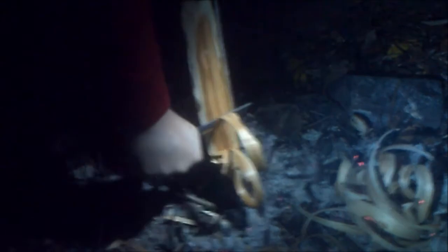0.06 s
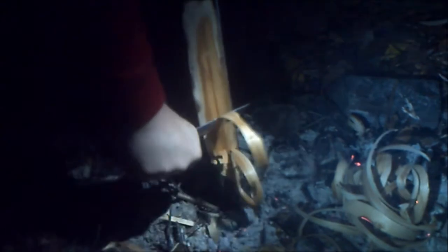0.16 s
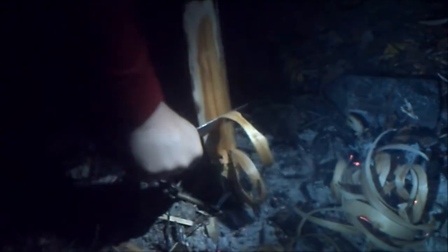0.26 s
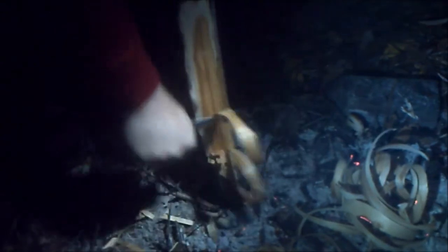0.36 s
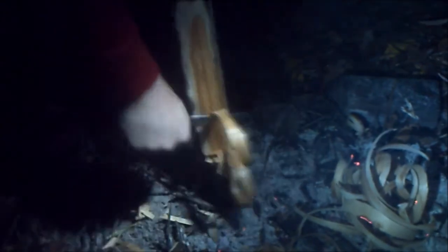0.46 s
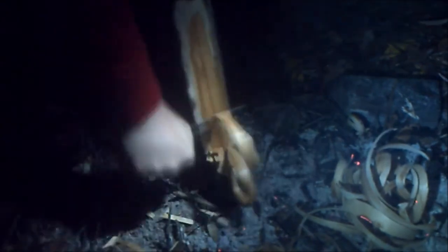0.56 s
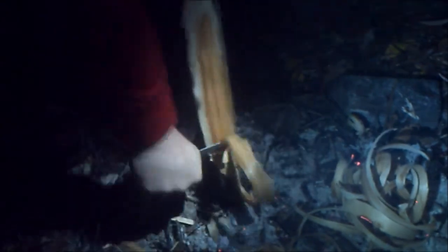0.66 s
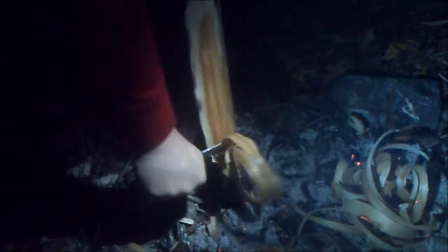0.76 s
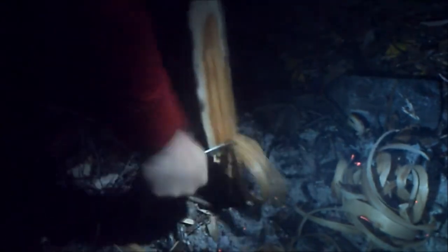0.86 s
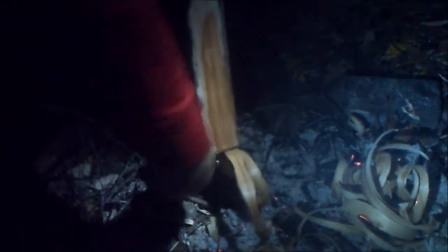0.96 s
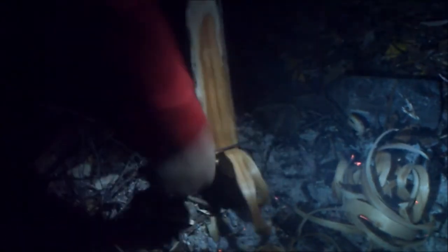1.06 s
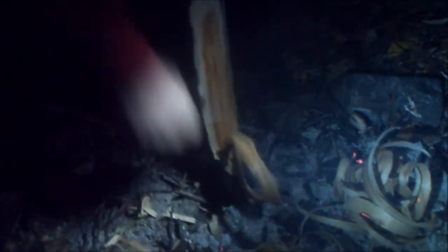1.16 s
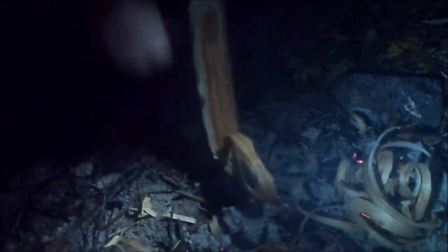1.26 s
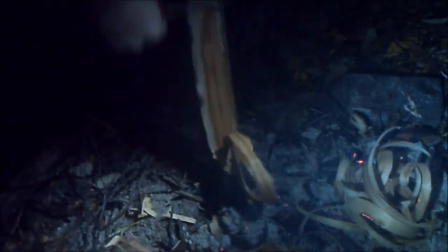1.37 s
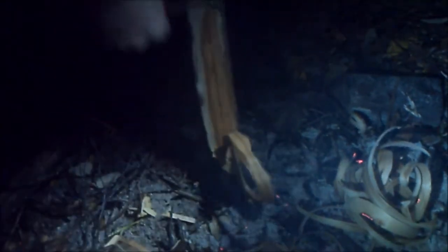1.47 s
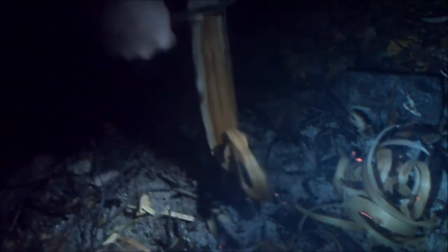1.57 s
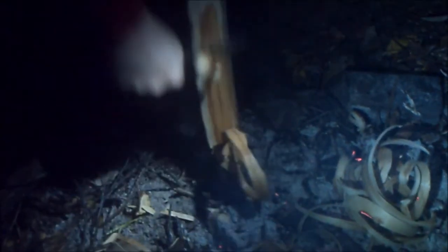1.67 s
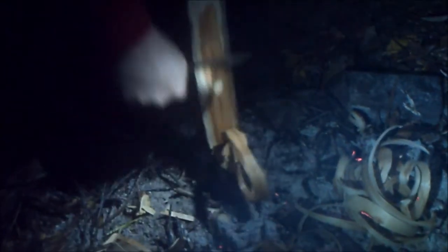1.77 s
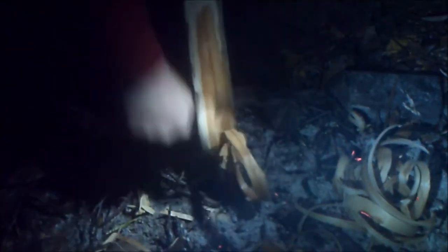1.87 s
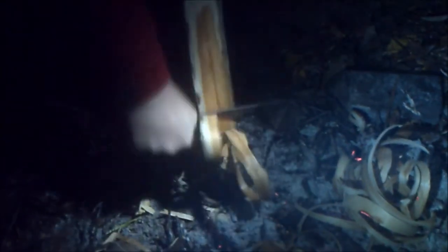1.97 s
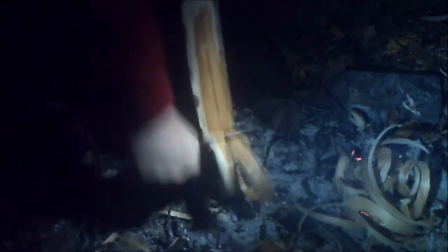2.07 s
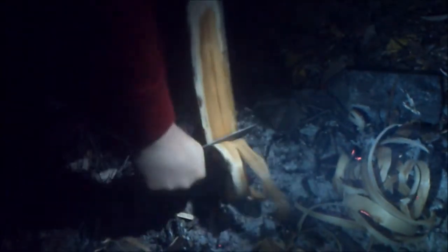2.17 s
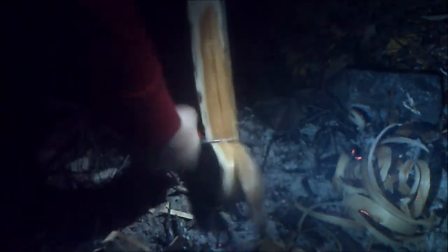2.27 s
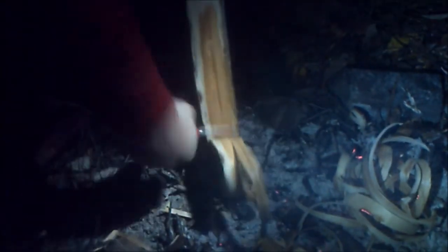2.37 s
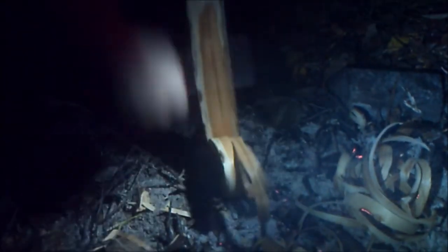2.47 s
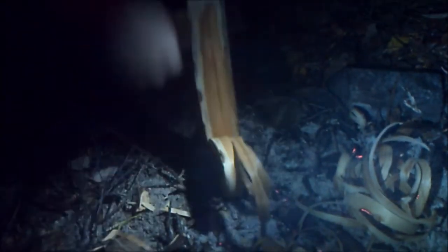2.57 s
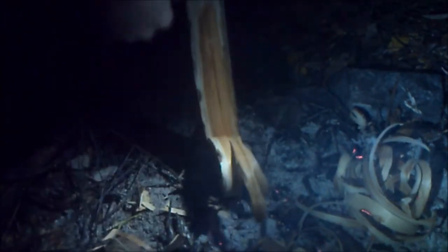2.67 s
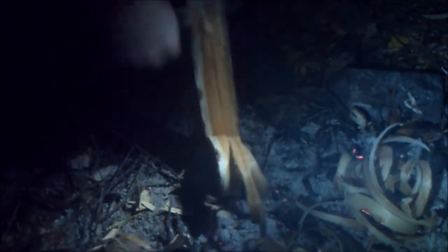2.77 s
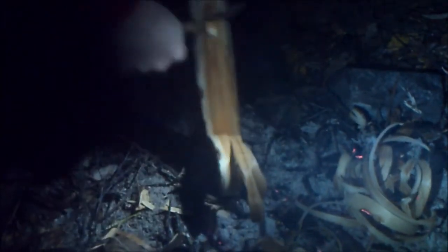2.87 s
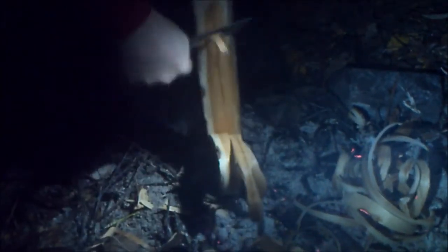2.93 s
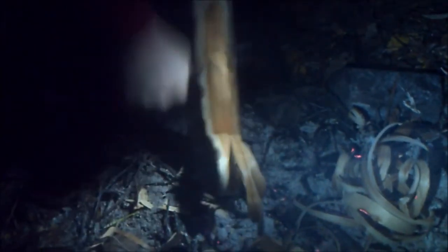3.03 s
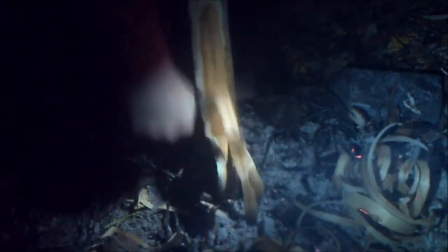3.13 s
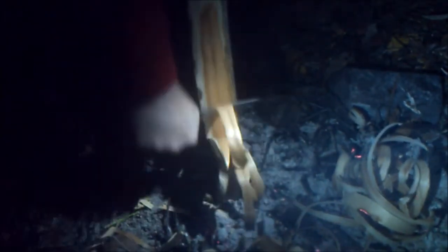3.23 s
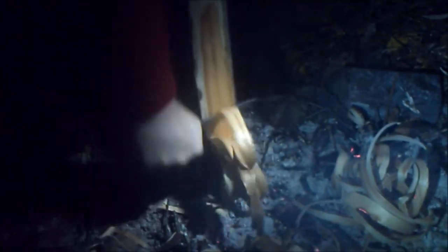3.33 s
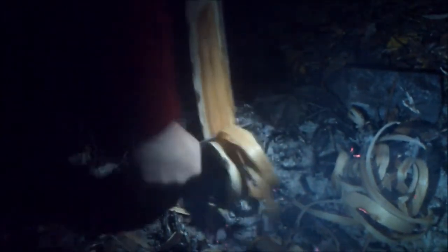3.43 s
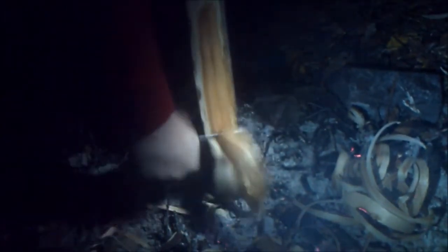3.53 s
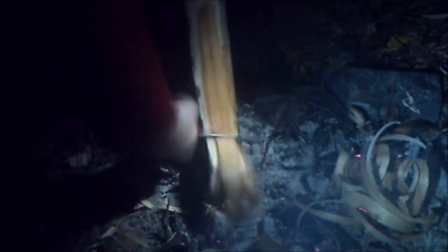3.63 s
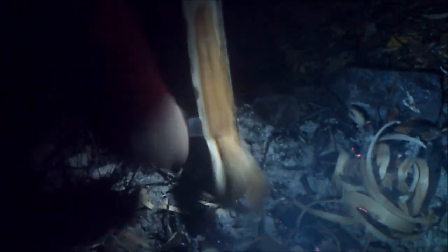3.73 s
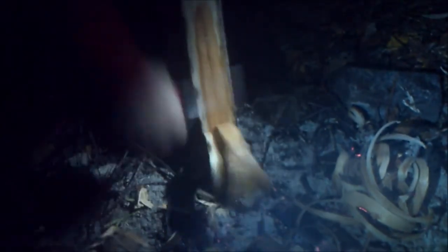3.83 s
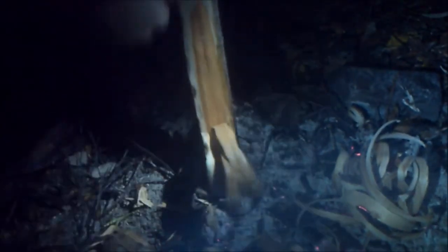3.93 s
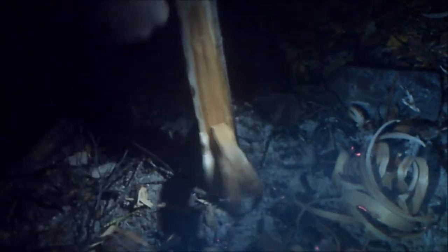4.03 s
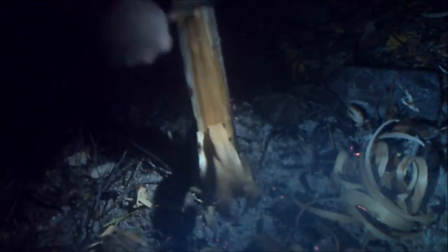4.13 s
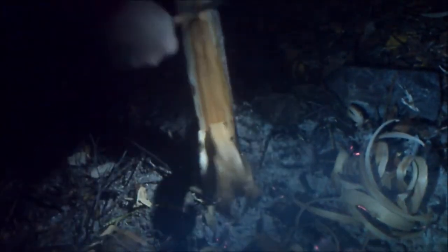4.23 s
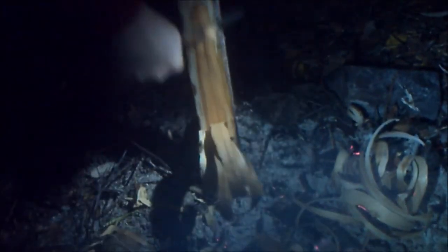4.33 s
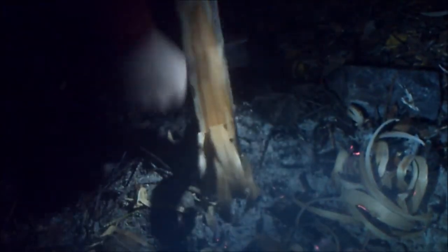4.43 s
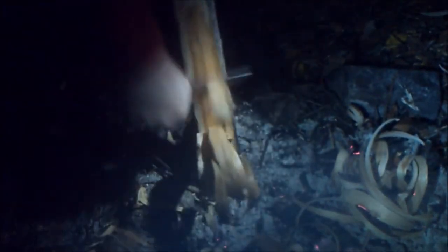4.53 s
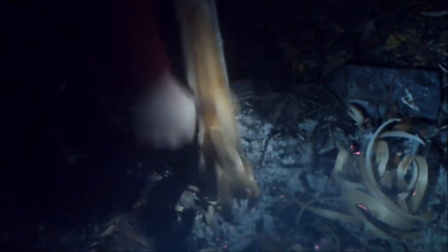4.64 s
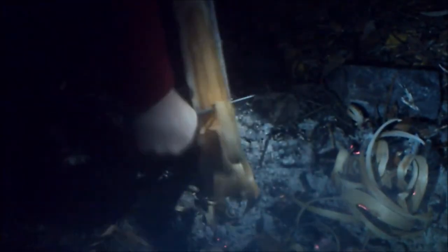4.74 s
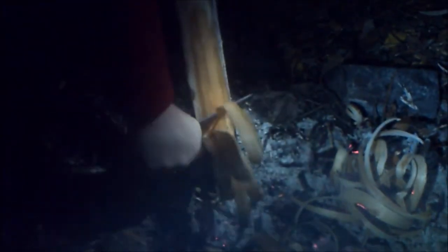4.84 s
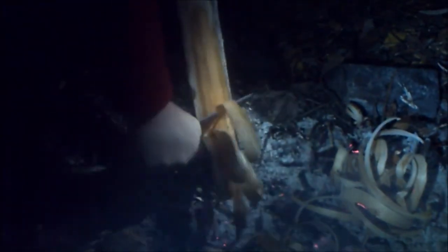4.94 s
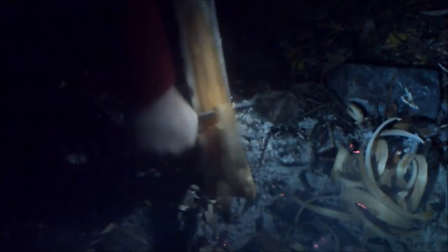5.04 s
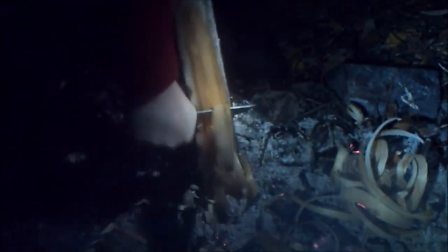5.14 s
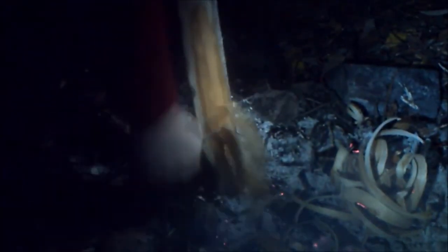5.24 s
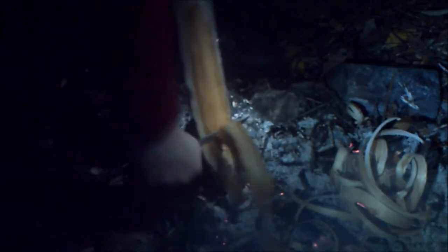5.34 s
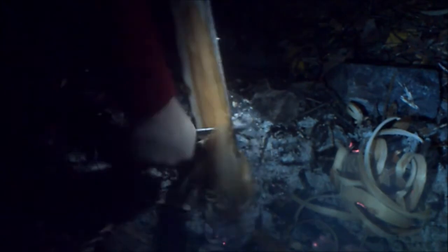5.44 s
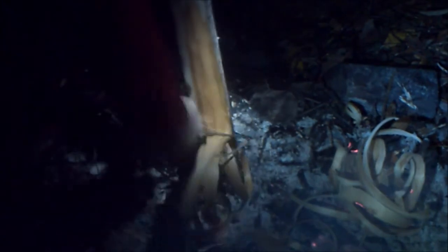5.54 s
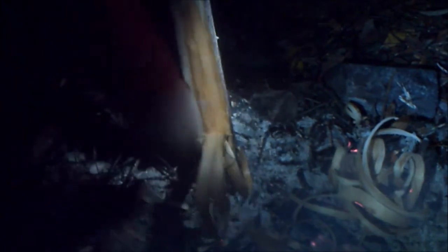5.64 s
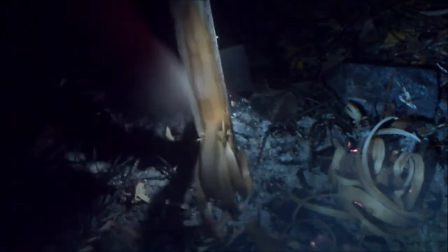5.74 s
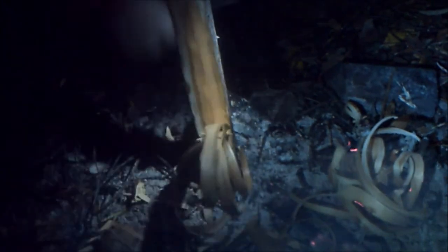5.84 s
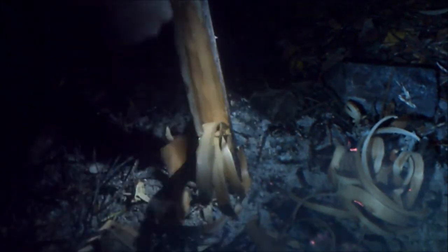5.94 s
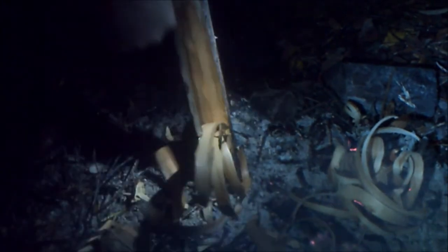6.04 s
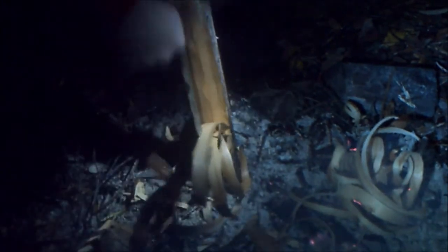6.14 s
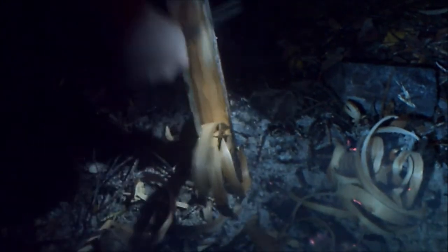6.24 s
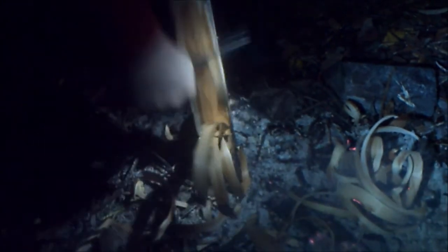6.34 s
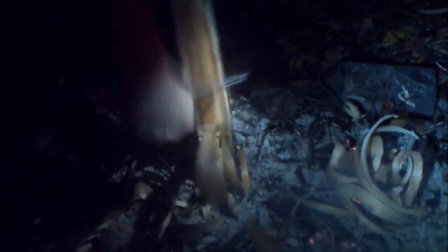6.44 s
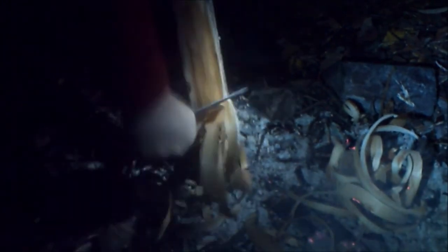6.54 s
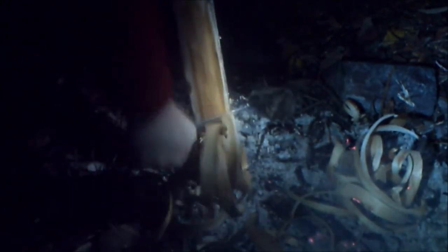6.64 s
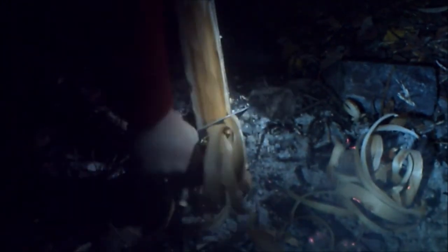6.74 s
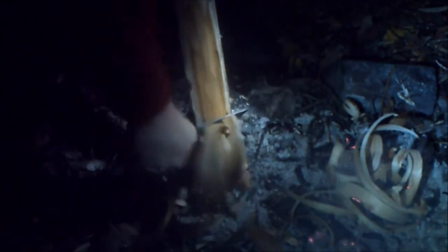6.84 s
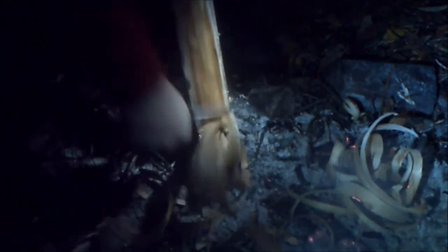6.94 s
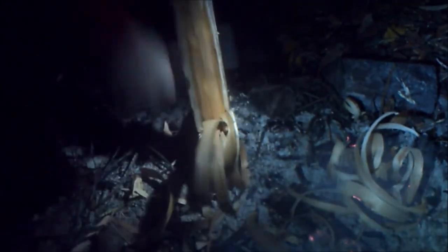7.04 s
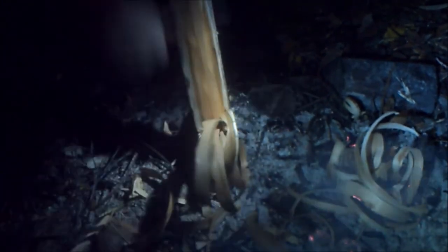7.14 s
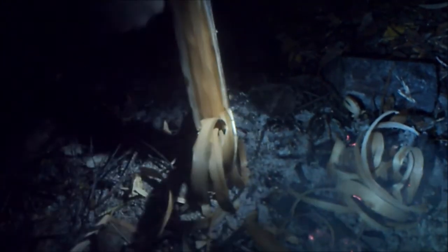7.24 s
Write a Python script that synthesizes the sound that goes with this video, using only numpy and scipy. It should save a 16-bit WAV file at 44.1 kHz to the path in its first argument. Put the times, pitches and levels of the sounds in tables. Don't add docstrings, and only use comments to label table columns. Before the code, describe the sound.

Very close to a small camera outdoors at night, a knife shaves curls from a stick. Bright, ragged scrapes and brittle snaps come in uneven bursts, with low thumps as the stick is jolted. Between strokes there are faint rustles, dry ticks and an occasional hollow rap. Steady noise with a soft low rumble and thin high whine lies underneath; the loudest cracks clip.

```python
import sys
import numpy as np
from scipy import signal
from scipy.fft import rfft, irfft, next_fast_len
from scipy.io import wavfile
from scipy.ndimage import uniform_filter1d, minimum_filter1d

SR = 44100
rng = np.random.default_rng(int(sys.argv[2]) if len(sys.argv) > 2 else 0)


def natural_amplitude(level_db):
    exponent = np.asarray(level_db, float) / 20
    return 10 ** exponent


def inscribe(sig):
    pcm = np.round(np.clip(np.atleast_2d(sig).T, -1, 1) * 32767)
    wavfile.write(sys.argv[1], SR, pcm.astype(np.int16))


N = 321919

# freq_hz, density_db
NOISE_SPECTRUM = [(12, -34), (20, 7), (140, 2.5), (199, 1), (317, 1), (1180, -7.5), (1780, -11),
                  (2400, -11), (2910, -12), (4770, -14), (8020, -14.5), (8700, -14.5), (9450, -14),
                  (11100, -18.5), (13900, -16)]
NOISE_DB = -45.5
# freq_hz, level_db
WHINES = [(8619, -63), (8689, -69), (8753, -87), (10815, -66)]

# freq_hz, density_db
EDGE_SPECTRUM = [(590, -49), (1000, -105), (1210, -126), (1500, -11.5), (2160, -11.5), (2520, -16.5),
                 (2970, -5.5), (3390, -11), (4370, -9), (6560, -3), (8170, -7), (10800, -2), (13900, -17.5)]
# freq_hz, width_hz, level_db
BLADE_MODES = [(2180, 150, -1), (1630, 120, -28), (6480, 1300, 9), (9130, 610, 15), (10700, 270, 9)]
# freq_hz, width_hz, level_db
BENDING_MODES = [(188, 82, -8.5), (240, 53, -4)]
# freq_hz, width_hz, level_db
WOOD_MODES = [(362, 73, 22), (620, 98, 7), (770, 190, 4), (1470, 350, -4), (2700, 340, -21)]

# start_s, end_s, hiss_db, chatter_db
PUSHES = [(1.6, 1.76, -35, -42), (1.775, 1.91, -26.5, -36.5), (2.0, 2.045, -28, -32.5),
          (2.875, 2.888, -33, -41.5), (2.975, 3.025, -31.5, -37.5), (3.045, 3.085, -32, -43),
          (3.1, 3.165, -28, -38.5), (3.31, 3.355, -39, -44), (3.685, 3.705, -36, -49),
          (4.375, 4.39, -26.5, -39.5), (4.458, 4.495, -30, -35.5), (4.582, 4.635, -34, -38),
          (4.745, 4.76, -40.5, -43), (5.465, 5.488, -34.5, -41), (6.14, 6.24, -48, -42),
          (6.265, 6.325, -33.5, -36), (6.408, 6.425, -36.5, -38.5)]
BITE_DB_PER_S, RELEASE_DB_PER_S = 476, 730
# start_s, end_s, hiss_db, chatter_db
RUSTLES = [(.21, .22, -56, -46), (.53, .66, -50, -49.5), (.895, .905, -44, -47.5), (1.058, 1.066, -45, -62),
           (1.2, 1.22, -48.5, -53), (1.54, 1.58, -45.5, -46), (1.93, 1.97, -41, -55),
           (2.22, 2.28, -50, -53), (2.745, 2.76, -46.5, -44.5), (3.18, 3.2, -42, -47),
           (3.27, 3.3, -40.5, -52), (3.57, 3.66, -44, -49), (4.07, 4.1, -50, -49), (4.22, 4.24, -43, -56),
           (4.26, 4.33, -46, -45), (4.69, 4.72, -50, -53), (5.02, 5.03, -47, -44.5),
           (5.25, 5.3, -43.5, -46), (5.37, 5.43, -49, -51.5), (5.6, 5.64, -45.5, -53.5),
           (6.02, 6.13, -48.5, -49.5), (2.78, 2.85, -48.5, -49.5), (6.05, 6.06, -42, -46),
           (6.47, 6.54, -47, -52)]
SWELL_DB_PER_S, SETTLE_DB_PER_S = 173, 200
# hiss_db, then chatter_db
HOVER_DB = [-60.5, -58]

# centre_s, level_db, colour_hz, width_s
SNAPS = [(.5569, -4, 7460, 0.0037), (.5515, -27, 9000, .002), (1.9745, -18, 5000, .002),
         (1.9783, -8, 11200, 0.0039), (1.9874, -13.5, 11000, 0.0052), (2.0163, -13, 6030, 0.0023),
         (2.0314, -9, 9100, 0.0064), (2.0421, -13.5, 10700, 0.0068), (2.878, -19, 7700, 0.0034),
         (3.3402, -21, 3500, 0.003), (3.5945, -26, 7000, 0.0022), (3.5862, -11.5, 9700, 0.0018),
         (4.411, -14.5, 8060, 0.005), (4.4136, -13.5, 7100, 0.0013), (4.5853, -21.5, 9300, 0.0082),
         (4.621, -19.5, 6850, 0.0095), (4.6389, -11, 6100, 0.0029), (5.2208, -15, 6950, 0.00048),
         (5.2265, -10, 10500, 0.00066), (4.653, -33, 8100, .003), (6.2253, -32, 9000, .004),
         (6.2546, -19, 8900, 0.0051), (6.3112, -29, 7600, 0.0048), (6.398, -27, 6800, 0.0028),
         (6.4, -18.5, 4370, 0.0046), (6.472, -44, 5500, 0.003), (6.591, -25, 2460, 0.0053),
         (6.584, -21.5, 2140, 0.0034), (6.6157, -18.5, 10700, 0.0046), (6.6242, -13, 8800, 0.0028)]
# centre_s, level_db, colour_hz, width_s
SLIPS = [(1.7222, -29, 9500, 0.0022), (1.7293, -30, 9700, 0.0049), (1.7446, -29, 9700, 0.0041),
         (1.7514, -30, 9000, 0.004), (1.7627, -28, 10100, 0.0025), (1.769, -23, 8800, 0.0045),
         (1.778, -30, 9900, 0.0038), (1.7887, -18.5, 7900, 0.0056), (1.7977, -17, 8200, 0.0056),
         (1.8293, -21, 9300, 0.0036), (1.8375, -23, 10000, 0.005), (1.8485, -22, 10100, 0.0054),
         (1.8749, -24, 7500, 0.0049), (1.8854, -28, 8200, 0.0034), (1.8947, -16, 7700, 0.0024),
         (1.9077, -22.5, 6800, 0.007), (1.9121, -23, 10100, 0.0029), (1.9286, -22, 5300, 0.0023),
         (1.9347, -30, 5500, 0.0024), (2.8583, -29.5, 9900, 0.0042), (2.8693, -38, 9500, 0.0026),
         (3.0947, -18, 10400, 0.002), (3.1009, -18, 9700, 0.006), (3.109, -18.5, 10800, 0.0035),
         (3.1155, -16, 10600, 0.0022), (3.135, -20, 8400, 0.0038), (3.1521, -22, 8400, 0.0021),
         (3.1585, -25, 6600, 0.0034), (3.1745, -22.5, 8800, 0.0034), (3.1824, -28, 9500, 0.0036),
         (4.3853, -25, 9700, 0.0036), (4.3913, -23, 10400, 0.002), (4.4401, -16, 6460, 0.0043),
         (4.448, -15, 8650, 0.0049), (4.4595, -22, 6600, 0.0031), (4.4646, -24, 7100, 0.0016),
         (4.469, -14.5, 7060, 0.004), (4.4751, -18, 6800, 0.0025), (4.4848, -21, 6800, 0.0049),
         (4.4941, -16, 8400, 0.0032), (4.5071, -18, 9000, 0.0024), (4.7473, -31, 7900, 0.0022),
         (4.7551, -30.5, 6200, 0.006)]
# centre_s, level_db, colour_hz
CRACKS = [(0.5657, -16, 9750), (0.581, -29, 11000), (3.432, -38, 9000), (3.544, -35, 9500),
          (3.605, -31, 10500), (0.6034, -16, 6170), (0.8712, -25.5, 8500), (1.949, -28, 5800),
          (1.969, -24, 4790), (2.005, -32, 4840), (2.155, -34, 7820), (2.894, -25, 6260),
          (3.0076, -13, 10400), (3.05, -30, 6480), (3.1453, -13.5, 8150), (3.2957, -26, 10100),
          (3.321, -35, 6510), (3.372, -30, 9230), (3.5663, -25.5, 10700), (3.6223, -30, 6000),
          (3.727, -25, 8600), (4.3377, -27, 7210), (4.3753, -28, 6600), (4.824, -24, 7400),
          (4.9496, -38, 6770), (5.019, -27, 10300), (5.366, -34, 6380), (5.3869, -22, 9100),
          (5.61, -32.5, 9210), (6.074, -28.5, 7100), (6.147, -19, 10800), (6.3588, -31, 8020),
          (6.422, -18, 11100), (6.5318, -26.5, 6850)]
# centre_s, level_db,
# colour_hz
TICKS = [(0.412, -35, 2900), (0.613, -24, 3160), (0.723, -40, 2870), (0.7377, -31.5, 2150),
         (0.7383, -34, 3040), (0.764, -39, 2180), (0.7914, -33.5, 2030), (.792, -37, 2970),
         (2.2447, -33, 1950), (2.2561, -21.5, 2060), (2.27, -37, 3000), (3.4033, -30, 3370),
         (4.7322, -35, 2950), (5.093, -34.5, 2740), (5.1921, -34, 5500), (5.263, -28, 3500),
         (6.0918, -33, 3250), (6.106, -25.5, 3270), (6.2634, -23.5, 2950), (5.2342, -7.5, 3080),
         (6.452, -26.5, 3220), (6.795, -30.5, 2200), (7.0838, -38, 3140)]
# centre_s, level_db, colour_hz
CATCHES = [(4.2433, -29.5, 10900), (4.268, -27, 10800), (4.2973, -24.5, 10300), (4.6045, -17, 6960),
           (6.1071, -28, 9000), (6.1621, -22, 6790), (6.1838, -22.5, 10600), (6.2023, -24.5, 9790),
           (6.2747, -20.5, 5900), (6.2919, -18.5, 10800), (7.085, -44, 6000)]
CRACK_S, TICK_S, CATCH_S = 0.00206, 0.0026, 0.0052
# start_s, end_s, level_db, colour_hz
JUDDERS = [
    (1.62, 1.712, -35.5, 10900),
]
SLIP_GAP_S, SLIP_JITTER, SLIP_SPREAD_DB, SLIP_S, SLIP_TINT = 0.011, 0.35, -5, 0.0058, 0.06
# freq_hz, level_db
SNAP_TILT = [(1500, -1.5), (3000, -2), (5500, -0.5), (11500, 0), (13500, -3)]

# centre_s, level_db, pitch_hz, width_s
TAPS = [(0.5578, -42.5, 711, 0.012), (0.6079, -35, 850, 0.013), (1.9796, -43.5, 682, 0.012),
        (2.0385, -55, 600, 0.019), (2.8969, -43.5, 727, 0.014), (3.1202, -42, 668, 0.0077),
        (3.3565, -24, 767, 0.0032), (3.586, -46, 751, 0.0055), (4.4142, -41, 743, 0.006),
        (4.4688, -48, 726, 0.0062), (5.23, -15.5, 1650.0, 0.003), (5.2345, -21.5, 597.7, 0.0057),
        (5.69, -39, 850, 0.013), (6.399, -30.5, 741, 0.0065), (6.4424, -28.5, 699, 0.0042),
        (6.5224, -30.5, 1068, 0.0098), (6.5878, -33.5, 675, 0.0048), (6.6254, -37.5, 1065, 0.0059),
        (6.798, -38, 521, 0.0071), (6.83, -47.5, 488, .035)]
# centre_s, level_db, pitch_hz, width_s
JOLTS = [(.5663, -29, 175, .0097), (.6086, -20.5, 217, 0.0064), (1.1804, -41, 335, .0065),
         (1.6716, -31.5, 166, .0089), (1.9886, -25, 184.6, 0.016), (2.0415, -26.5, 171, 0.0056),
         (2.5344, -40, 284, 0.0066), (2.883, -34, 219.5, 0.019), (3.0177, -28.5, 200.7, 0.016),
         (3.1073, -32, 223, .0034), (3.3602, -23.5, 164.4, 0.007), (4.3041, -32, 184.3, 0.011),
         (4.3899, -36, 251.4, .01), (4.4252, -38.5, 210, .012), (4.5018, -29.5, 211, 0.011),
         (4.5956, -28, 209, 0.0086), (4.6453, -25, 237.6, .0044), (5.2388, -22.5, 188, 0.01),
         (5.7565, -42.5, 203, 0.019), (6.117, -41, 247, 0.0088), (6.1445, -30, 151, 0.0099),
         (6.19, -27.5, 212, .0067), (6.397, -22.5, 267, 0.007), (6.4259, -30, 218.4, 0.0094),
         (6.4455, -19, 208, .006), (6.5269, -24, 188, 0.013), (6.5918, -18, 188, 0.012),
         (6.6291, -26.5, 205, 0.01)]
# centre_s, level_db, width_s
SHUDDERS = [(1.5935, -30.5, 0.052), (1.713, -37, 0.027), (1.8023, -29.5, 0.049), (1.846, -28.5, 0.022),
            (1.891, -37, 0.02), (3.133, -37.5, 0.025), (4.243, -42.5, 0.022), (4.47, -29, 0.034),
            (4.62, -38, 0.033), (6.2844, -28, 0.028)]
SHUDDER_HZ = 190.8

# start_s, end_s, first_db, last_db, colour_hz
TEARS = [(0.585, 0.593, -32, -17, 7000), (.592, 0.595, -10.5, -19, 6600), (.597, 0.605, -18, -19, 6300),
         (0.609, 0.617, -32, -29, 9000), (2.975, 2.997, -14, -23, 9400), (3.331, 3.346, -29, -15, 8000),
         (3.346, 3.357, -7.5, -10, 7060), (3.361, 3.386, -29, -43, 9000), (5.21, 5.233, -40, -24, 8000),
         (5.252, 5.266, -46, -36, 9000), (5.2213, 5.23, -14, -11.5, 5900), (5.23, 5.234, -11.5, 1, 10000),
         (5.233, 5.237, -12, -24, 7000), (6.133, 6.142, -19.5, -27, 9900),
         (6.3887, 6.406, -17.5, -22.5, 7800), (6.389, 6.404, -29, -27, 2160),
         (6.512, 6.528, -32.5, -36, 2000), (6.598, 6.612, -32, -41, 7900), (6.431, 6.442, -23.5, -23, 5900),
         (6.511, 6.526, -24.5, -21, 7800), (6.577, 6.592, -20, -15, 7340)]
TEAR_START_S, TEAR_STOP_S = 0.0011, 0.00065

# start_s, peak_db, pitch_hz, ring_s, upper_modes_db
RAPS = [(1.178, -23, 574, 0.0037, -10.5), (2.531, -18.5, 654, 0.0049, -6), (2.6098, -29.5, 1000, .006, -22),
        (3.8459, -18, 727, 0.0041, -5), (3.853, -33.5, 620, 0.0076, -8), (5.6812, -31, 860, .003, -10),
        (5.6832, -24, 830, 0.0028, -15), (5.6958, -24.5, 840, 0.0042, -12), (7.076, -21, 662, 0.0044, -9.5)]
# pitch_ratio, level_db, share_of_ring_time
RAP_MODES = [(2.2, -5, 0.86), (2.9, -8, 0.62), (4.3, -5, 0.47), (5.4, -10.5, 0.55)]

# centre_s, length_s
SOFT_DROPOUTS = [(s, .038) for s in (.513, 1.025, 1.475, 2.35, 2.626, 4.14, 4.183, 4.8, 5.125, 5.442, 5.592, 6.89)]
# centre_s, length_s
HARD_DROPOUTS = [(.858, .028), (3.915, .046), (3.94, .046), (4.895, .05)]
# centre_s, length_s, level_db, tones_hz
WHISTLES = [(.627, .03, -43, (1421, 2024, 5404, 5878, 6384)),
            (1.728, .026, -43, (3176, 6696, 6976, 8774, 10486)),
            (1.812, .032, -36, (2217, 5867, 6718, 7396, 8516, 9485, 10723)),
            (2.987, .028, -31, (3025, 7655, 8290, 9442, 10077, 10885, 11251)),
            (3.265, .03, -51, (3574, 7967, 9000, 9560, 10217, 10594)),
            (5.247, .026, -42, (7655, 9087, 10723))]
LEAKS_S = [3.349, 3.586, 4.4135]
LEAK_DB = -9


def evened(x):
    return x / np.sqrt(np.mean(x ** 2) + 1e-20)


def coloured(x, points):
    f, db = np.transpose(points)
    size = next_fast_len(len(x))
    hz = np.fft.rfftfreq(size, 1 / SR)
    gain = natural_amplitude(np.interp(np.log(hz + 1), np.log(f + 1), db))
    return irfft(rfft(x, size) * gain, size)[:len(x)]


def resonate(x, hz, width):
    r = np.exp(-np.pi * width / SR)
    return 2 * signal.lfilter([1 - r], [1, -r * np.exp(2j * np.pi * hz / SR)], x).real


def body(x, modes):
    return sum(natural_amplitude(db) * resonate(x, hz, width) for hz, width, db in modes)


def add(mix, s, sound):
    part = mix[max(round(s * SR), 0):][:len(sound)]
    part += sound[:len(part)]


def swell(width, rise, shortest, power=0.58):
    u = (np.arange(3000) - 1500) / (np.clip(width, shortest, .04) * SR)
    return np.exp(-np.where(u < 0, (u / rise) ** 2, abs(u / (1.2 - rise)) ** power))


def tearing(noise, hz, broad=1.0, sharp=0.073):
    own = evened(resonate(resonate(noise, hz, sharp * hz + 1300), hz, hz))
    hiss = broad * min(hz / 5000, 1) * evened(coloured(noise, EDGE_SPECTRUM))
    return coloured(hiss + own, SNAP_TILT)


def camera():
    flicker = natural_amplitude(0.51 * evened(uniform_filter1d(rng.standard_normal(N), size=1500)))
    hiss = natural_amplitude(NOISE_DB) * flicker * evened(coloured(rng.standard_normal(N), NOISE_SPECTRUM))
    whines = sum(natural_amplitude(db + 1) * evened(resonate(rng.standard_normal(N), hz, 15)) for hz, db in WHINES)
    return hiss + whines


def pressure(rows, rise_db_per_s, fall_db_per_s):
    t = np.arange(0, N + 64, 64) / SR
    start, end, *level_db = np.transpose(rows)[:, :, None]
    off_db = rise_db_per_s * np.maximum(start - t, 0) + fall_db_per_s * np.maximum(t - end, 0)
    powers = [(natural_amplitude(db - off_db) ** 2).sum(0) for db in level_db]
    return np.array([np.interp(np.arange(N) / SR, t, power) for power in powers])


def strokes(grains_per_s=300, grain_db=6.0, smooth=0.61, ring_db=-1, patchy_db=3, hum_db=-4):
    sizes = (rng.random(N) < grains_per_s / SR) * natural_amplitude(grain_db * np.minimum(rng.exponential(1, N), 2))
    u = np.arange(400) / (0.00116 * SR)
    grains = evened(signal.oaconvolve(sizes, u * np.exp(-u))[:N])
    tear = rng.standard_normal(N) * (smooth + (1 - smooth) * grains)
    edge = evened(coloured(tear, EDGE_SPECTRUM)) + natural_amplitude(ring_db) * evened(body(tear, BLADE_MODES))

    z = signal.stft(edge, nperseg=256)[2]
    patches = uniform_filter1d(rng.standard_normal(z.shape[::-1]), size=16, axis=0)
    patches = uniform_filter1d(patches, size=6, axis=1)
    edge = signal.istft(z * natural_amplitude(patchy_db * evened(patches).T), nperseg=256)[1][:N]
    low = signal.sosfiltfilt(signal.butter(4, 4200, fs=SR, output="sos"), edge)

    blade = 0.54 * evened(resonate(resonate(tear, 3540, 350), 3260, 600))
    bending = evened(resonate(body(rng.standard_normal(N), BENDING_MODES), 140, 150))
    hum = bending + 0.31 * evened(resonate(resonate(tear, 690, 400), 690, 400))

    push = pressure(PUSHES, BITE_DB_PER_S, RELEASE_DB_PER_S)
    rustle = pressure(RUSTLES, SWELL_DB_PER_S, SETTLE_DB_PER_S)
    hiss, chatter = np.sqrt(push + rustle + natural_amplitude(HOVER_DB)[:, None] ** 2)
    pressed = np.clip(chatter / natural_amplitude(-45), 0, 1)
    return hiss * evened(edge - low) + chatter * (evened(low) + pressed * blade + natural_amplitude(hum_db) * hum)


def slip_rows():
    rows = list(SNAPS) + list(SLIPS)
    for table, width in ((CRACKS, CRACK_S), (TICKS, TICK_S), (CATCHES, CATCH_S)):
        rows += [(*r, width) for r in table]
    draws = rng.standard_normal((len(JUDDERS), 4, 12))
    for (start, end, db, hz), (a, b, c, d) in zip(JUDDERS, draws):
        order = np.arange(len(a))
        s = start + SLIP_GAP_S * (order + SLIP_JITTER * np.clip(a, -2, 2) * (order > 0))
        past_db = 4000 * np.maximum(s - end, 0)
        tint = np.minimum(hz * np.exp(SLIP_TINT * c), 11500)
        rows += zip(s, db + SLIP_SPREAD_DB * b - past_db, tint, SLIP_S * np.exp(0.17 * d))
    return rows


def slips(ragged_db=3, lift_db=1):
    out, rows = np.zeros(N), slip_rows()
    draws = rng.standard_normal((len(rows), 2, 3000))
    for (s, db, hz, width), (noise, ragged) in zip(rows, draws):
        rough = natural_amplitude(ragged_db * evened(uniform_filter1d(ragged, size=25)))
        burst = swell(width, 0.53, 0.0004, power=0.83) * rough * tearing(noise, hz)
        heard = swell(np.hypot(width, .0017), .45, .0005)
        level = natural_amplitude(db + lift_db) * np.linalg.norm(heard) / np.linalg.norm(burst)
        add(out, s - 1500 / SR, level * burst)
    return out


def knocks(rows, shortest, rise, rough, upper, overtone):
    out, t = np.zeros(N), np.arange(3000) / SR
    for (s, db, hz, width), noise in zip(rows, rng.standard_normal((len(rows), 3000))):
        tones = np.sin(2 * np.pi * hz * t + noise[0])
        tones += upper * np.sin(2 * np.pi * 1.45 * hz * t + 3 * noise[1])
        rub = overtone * evened(body(noise, WOOD_MODES))
        rub += rough * evened(resonate(resonate(noise, hz, 0.47 * hz), hz, 0.47 * hz))
        shape = natural_amplitude(db) * swell(width, rise, shortest, power=1.24)
        add(out, s - 1500 / SR, shape * (np.sqrt(2) * tones + rub))
    return out


def taps():
    return knocks(TAPS, 0.0038, rise=0.48, rough=0.48, upper=0.04, overtone=0.97)


def bends():
    shifts = rng.uniform(-0.86, 1, len(SHUDDERS))
    rows = list(JOLTS)
    for (s, db, width), shift in zip(SHUDDERS, shifts):
        rows.append((s, db, SHUDDER_HZ * (1 + 0.075 * shift), width))
    return knocks(rows, 0.0074, rise=0.63, rough=0.45, upper=0.25, overtone=0.076)


def tears(ragged_db=2.0):
    out, t = np.zeros(N), (np.arange(2000) - 300) / SR
    draws = rng.standard_normal((len(TEARS), 2, len(t)))
    for (start, end, first_db, last_db, hz), (noise, ragged) in zip(TEARS, draws):
        db = np.interp(t, [0, end - start], [first_db, last_db])
        db = db + ragged_db * evened(uniform_filter1d(ragged, size=30))
        outside = np.maximum(-t / TEAR_START_S, (t - end + start) / TEAR_STOP_S)
        gate = np.exp(-np.maximum(outside, 0) ** 2)
        add(out, start + t[0], natural_amplitude(db) * gate * evened(tearing(noise, hz)))
    return out


def raps():
    out, t = np.zeros(N), np.arange(900) / SR
    for s, db, hz, ring, upper_db in RAPS:
        modes = [(1, 0, 0.84)] + [(k, upper_db + d, share) for k, d, share in RAP_MODES]
        for k, d, share in modes:
            envelope = (1 - np.exp(-2 * k * hz * t)) * np.exp(-(t / (share * ring)) ** 2)
            add(out, s, -natural_amplitude(db + d) * np.sin(2 * np.pi * k * hz * t) * envelope)
    return out


def scene():
    near = strokes() + slips() + taps() + bends() + tears() + raps()
    return (near + 0.057 * np.roll(near, 70) + camera())[None]


def dropouts(x, count=4, tone_db=3, left=0.054):
    out = x.copy()
    # centre_s, length_s, taper, share of the sound treated, whether peaks are kept
    spans = [(*r, 1, .93, 1) for r in SOFT_DROPOUTS] + [(*r, .6, 1, 1) for r in HARD_DROPOUTS]
    spans += [(*r[:2], .7, 1 - left, 0) for r in WHISTLES]
    for s, length, taper, share, keep in spans:
        at = slice(round((s - length / 2) * SR), round((s + length / 2) * SR))
        size = len(x[at])
        z = rfft(share * out[at] * signal.windows.tukey(size, taper))
        hz = np.fft.rfftfreq(size, 1 / SR)
        inside = (hz > 800) & (hz < 12600)
        peaks = abs(z) == -minimum_filter1d(-abs(z), size=40)
        tops = abs(z) * inside * peaks
        kept = np.convolve(tops >= np.sort(tops)[-count], [1, 1, 1], "same") > 0
        out[at] -= irfft(z * inside * (1 - keep * natural_amplitude(tone_db) * kept), size)
    for s, length, db, tones in WHISTLES:
        t = np.arange(0, length, 1 / SR)
        chord = sum(np.sin(2 * np.pi * f * t + f) for f in tones)
        add(out, s - length / 2, natural_amplitude(db + 3) * np.sin(np.pi * t / length) * chord)
    return out


def top_cut(x):
    return signal.sosfilt(signal.butter(12, 16300, fs=SR, output="sos"), x)


def record(dry):
    hot = np.clip(dry[0], -.92, .92)
    kept = coloured(hot, [(13700, 0), (13900, -3), (14250, -42), (16000, -56), (16600, -90)])
    opened = sum(np.exp(-((np.arange(N) / SR - s) / .004) ** 2) for s in LEAKS_S)
    leak = coloured(opened * hot, [(13900, -90), (14200, 0), (15900, -6), (16300, -70)])
    mix = dropouts(kept + natural_amplitude(LEAK_DB) * leak)[None]
    return top_cut(mix)


dry = scene()
out = record(dry)
inscribe(out)
```